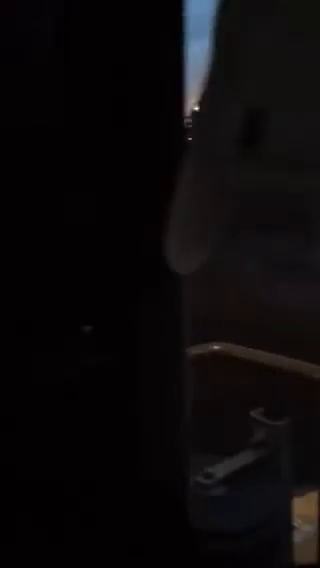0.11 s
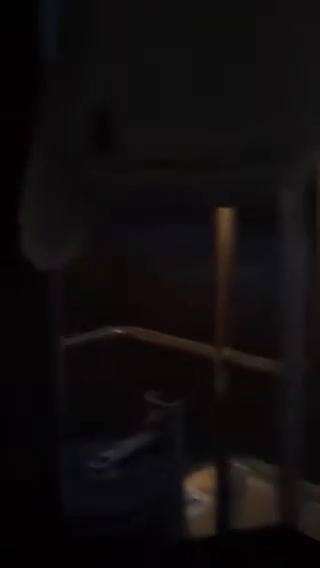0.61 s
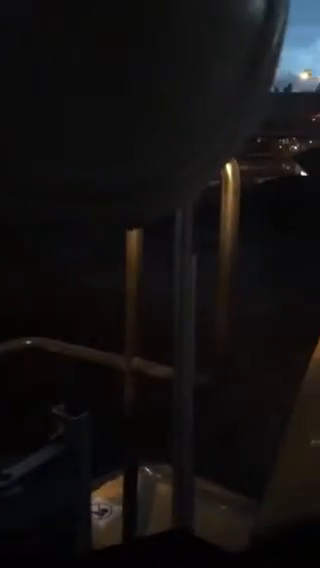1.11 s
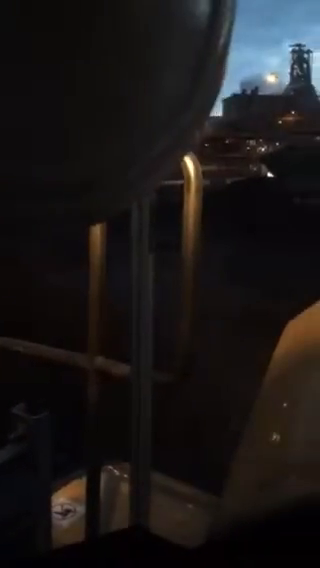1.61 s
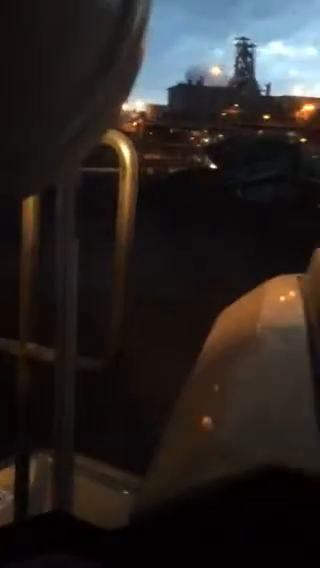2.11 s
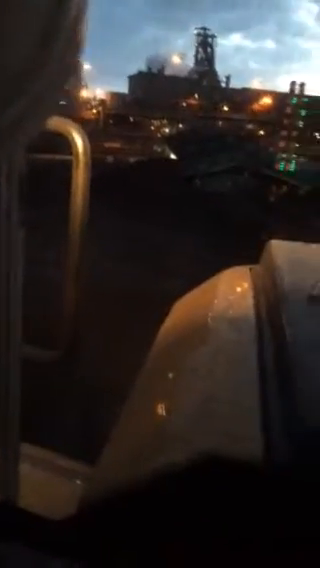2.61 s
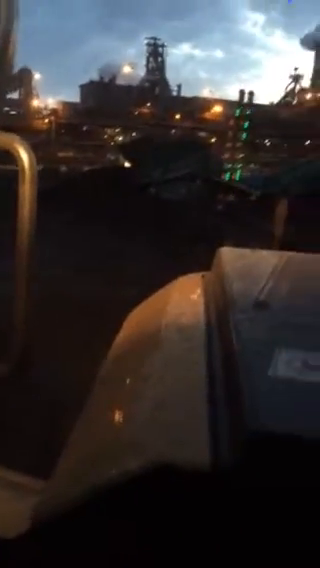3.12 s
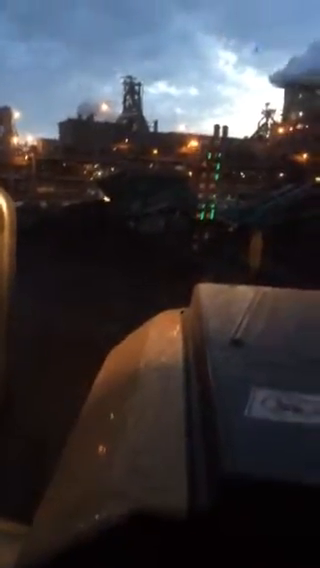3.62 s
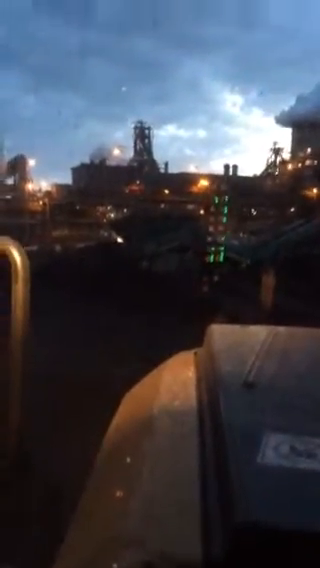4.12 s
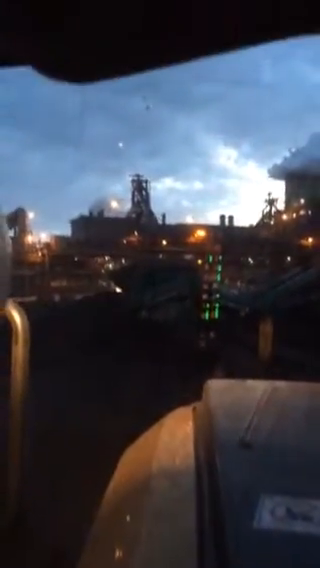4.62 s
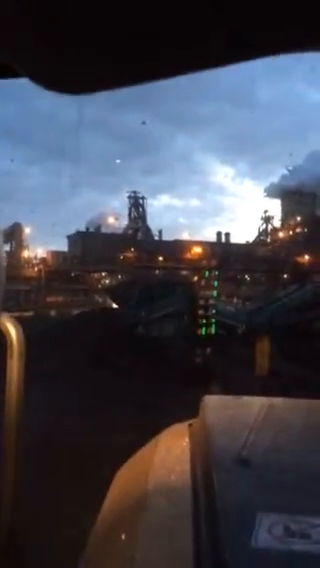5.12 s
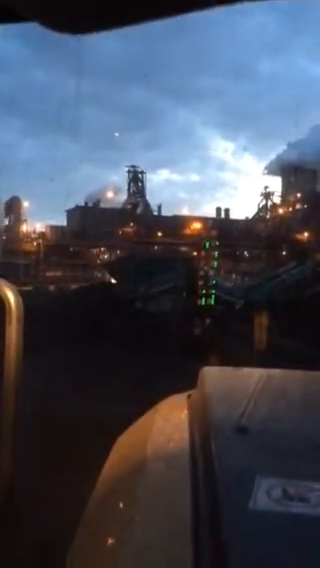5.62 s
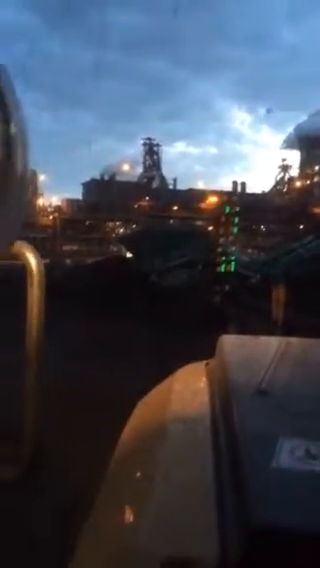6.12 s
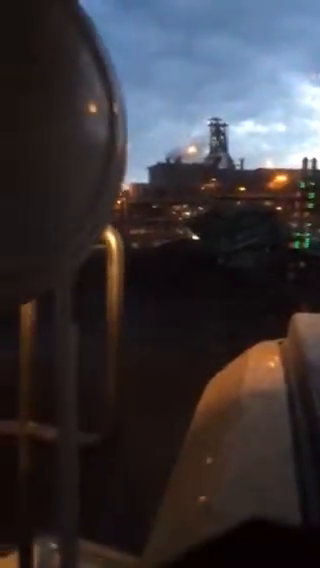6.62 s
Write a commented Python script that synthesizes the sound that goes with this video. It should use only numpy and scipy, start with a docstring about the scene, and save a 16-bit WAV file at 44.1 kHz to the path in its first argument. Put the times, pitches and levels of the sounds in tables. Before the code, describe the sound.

From inside a closed heavy loader cab, a six-cylinder diesel idles throughout, low and boomy, with muffled firing clatter and a steady hydraulic pump hum. A thin blower whine drifts slightly in pitch. Soft hand-like swishes brush near the phone, and a loose panel buzzes faintly in spells. Just after four seconds the idle dips slightly, with dull ticks and a brighter swish, then recovers and continues to the end.

```python
"""Inside a cab: a six-cylinder diesel loader idles near 800 rpm; crank orders and a nine-piston pump hum throughout.
From the start shaken panels boom at an uneven level in the cab's air modes, under firing-pulsed clatter;
a brushed blower motor whines on its own drifting speed beside steady electric tones. A hiss swishes at 0.5 s,
then a panel buzzes in spells. Near 4.1 s the idle sags about 10 rpm, one firing harmonic swells, dull ticks fall
and the brightest swish passes; by 5 s the idle is back, and soft swishes and buzzes run to the end."""
import sys
import numpy as np
from scipy import signal
from scipy.fft import rfft, irfft, next_fast_len
from scipy.io import wavfile
from scipy.ndimage import uniform_filter1d, map_coordinates

SR = 44100
rng = np.random.default_rng(int(sys.argv[2]) if len(sys.argv) > 2 else 0)


def to_wav(sig):
    """Store sig (one row per channel, or 1-D mono) as 16-bit WAV at the path in sys.argv[1].

    Samples outside -1..1 are clipped; the rate is SR.
    """
    pcm = np.clip(np.atleast_2d(sig), -1, 1) * 32767
    pcm = np.round(pcm).astype(np.int16)
    wavfile.write(sys.argv[1], SR, pcm.T)  # frames by channels


def nominal_scale(level):
    """Amplitude ratio for a level in decibels (scalar or array-like)."""
    x = np.asarray(level, float) / 20
    return 10 ** x


N = 297673
T = np.arange(N) / SR  # time in seconds

# short dull ticks: start_s, level_db
TICK_HITS = [(4.094, -55), (4.11, -45.5), (4.17, -50), (4.236, -52)]
# swishes of bright hiss, as of cloth or a hand brushing near the phone; rise and fall each span 20 dB:
# peak_s, level_db, rise_s, hold_s, fall_s
SWISHES = [(.55, -62.5, .2, .17, .5), (1.95, -73, .35, .01, .3), (2.61, -70, .07, .005, .1),
           (3.05, -73, .9, .3, .4), (4.12, -61, .1, .03, .3), (4.87, -75, .05, .005, .05),
           (6.35, -72, .6, .02, .9), (6.73, -67, .12, .05, .2)]
# colour of that hiss: pitch_hz, relative density_db per Hz
HISS_COLOUR = [(600, -4), (1500, 2), (3000, -1), (6000, -5), (10000, -8), (14200, -11), (15400, -15)]
# spells of a buzzing panel: centre_s, half_length_s, level_db
BUZZ_SPELLS = [(.85, .25, -69), (1.2, 0.37, -68), (1.55, .3, -66), (1.95, 0.47, -67.5), (2.45, .2, -67.5),
               (3.0, 0.68, -74), (3.8, 0.48, -71), (5.1, 0.55, -73), (6.3, .25, -75), (6.6, 0.27, -68)]
# tones that ignore the crank, as of electric motors: pitch_hz, level_db (rms)
ELECTRIC_TONES = [(100.3, -36), (200.5, -46), (300.8, -71), (753.5, -67), (2482, -76), (9598, -97),
                  (15032, -103)]
# blower whine over time: time_s, bar_rate_hz of the commutator, level_db (rms) of its strongest harmonic, the 2nd
BLOWER_WHINE = [(0, 1134, -66), (.3, 1137, -68), (.6, 1148, -68), (.92, 1156.5, -61), (1.3, 1151, -70),
                (1.6, 1145, -64), (2.2, 1158.5, -75), (2.6, 1151.5, -63.5), (2.9, 1145, -79),
                (3.3, 1132.5, -70), (3.5, 1130.5, -65.5), (3.9, 1133, -66), (4.15, 1130, -72),
                (4.5, 1135.5, -71), (4.7, 1144, -72), (4.9, 1152, -63.5), (5.5, 1157, -63),
                (5.75, 1153.5, -62), (6.1, 1141, -65), (6.3, 1135.5, -61.5), (6.75, 1130, -63)]
# weaker tones of the blower: order of the shaft speed, level_db (rms)
BLOWER_SHAFT = [(19, -71), (20, -72), (43, -84), (49, -86), (69, -89), (81, -84), (83, -93), (91, -91),
                (99, -88), (101, -89), (107, -95), (108, -95), (109, -94), (113, -96), (117, -94),
                (119, -95), (120, -93), (121, -94), (122, -97), (133, -100), (140, -100), (159, -100),
                (164, -101), (172, -100), (173, -101), (175, -101), (177, -100), (179, -101), (186, -103),
                (200, -105)]
# higher harmonics of the bar rate: harmonic number
BAR_HARMONICS = 3, 4, 5, 8, 9
# their usual levels, in the same sequence: level_db (rms)
BAR_LEVELS = [-81, -83.5, -83, -94, -93]
# moments when one of them swells as the phone moves, a table for each: centre_s, half_length_s, rise_db
BAR_SWELLS = [
    [(.2, .25, 7.5), (1.6, 0.27, 11), (3.6, 1, 8.5), (6.3, .15, 0)],
    [(.15, .2, 9), (.95, 0.49, 11), (1.95, .35, 8), (2.8, .3, 8), (3.7, .15, 6), (4.7, .15, 13),
     (5.6, 0.33, 8)],
    [(.95, .4, 8), (2.3, .15, 0), (2.9, .5, 6.5), (3.85, .3, 7), (4.3, .15, 7), (5.2, .6, 5)],
    [(.2, .3, 4), (1.2, .4, 9), (1.9, .2, 10), (3.7, .3, 3), (4.5, .15, 6), (5.4, .3, 7), (6.2, .3, 8)],
    [(.4, .4, 7), (1.4, .25, 10), (1.9, .2, 10), (2.55, .2, 7), (3.1, .4, 12), (3.9, .3, 10), (4.7, .3, 8),
     (5.5, .15, 6), (6.35, .55, 10)],
]
# colour of the clatter and fan air through the cab walls, low part: pitch_hz, relative density_db per Hz
CLATTER_LOW = [(240, -31), (275, -29.5), (315, -11.5), (400, -2.5), (460, -10.5), (520, -7), (575, -6),
               (640, -11.5), (760, -10.5), (860, -18), (900, -9.5), (1000, -12.5), (1300, -14),
               (1560, -16.5), (1650, -18.5), (1800, -39.5)]
# the same, high part: pitch_hz, relative density_db per Hz
CLATTER_HIGH = [(1600, -17), (1750, -0.5), (2250, -0.5), (2550, -4.5), (2820, -2.5), (2960, -6), (3600, -5),
                (4400, -9), (5200, -10), (6000, -14), (6800, -13.5), (7300, -18.5), (10300, -20.5),
                (13700, -27), (14500, -24), (15400, -35)]
# clatter levels as the phone turns: time_s, low_db, extra_db round 1 kHz, high_db
CLATTER_LEVELS = [(0, -50.5, 4.5, -58), (1.2, -52, 5.5, -58), (3, -49.5, 1.1, -58), (4, -48.5, -2.5, -59),
                  (5, -49, -0.8, -59.5), (6.75, -49, 1.5, -58.5)]
# reflections off glass and panels: extra_path_ms (mean), level_db against the direct sound
REFLECTIONS = [(2.3, -17), (4.1, -16), (6.7, -16), (9.4, -17), (13.9, -17)]
# air modes of the cab: pitch_hz, width_hz (about 3 dB down), relative level_db
CAB_MODES = [(43.3, 54, -14.5), (73.3, 40, -10.5), (99.8, 17.4, -5.5), (116.2, 19.3, -3.5),
             (153.4, 11.2, -1), (179, 9.1, -12), (192.4, 18, -7.5), (213.7, 5.9, -14), (250.6, 17, -19.5)]
# slow and quick level changes of the boom noise: centre_s, half_length_s, lower_modes_db, upper_modes_db
BOOM_LEVEL = [(0.103, 0.42, 1, 1.5), (0.678, 0.052, -9, 0), (0.91, 0.22, 3, 5.5), (1.217, 0.11, -1, -4),
              (1.305, 0.073, 4, 5.5), (1.835, 0.12, -3, 1), (1.99, 0.14, 5, 4), (2.272, 0.072, -7, -1),
              (2.385, .08, 2.5, -4.5), (2.778, .08, -8, 2.5), (2.988, 0.08, -11, 3), (3.298, 0.071, 9, -5),
              (3.567, 0.056, 2, -6), (4.248, 0.26, 1, -1), (4.57, 0.027, -5, -8), (5.154, .2, 2.5, -0.5),
              (5.314, 0.12, -12, 4.5), (5.47, 0.092, 3.5, 4), (5.614, 0.082, -7, 2), (6.645, 0.049, 5, -2),
              (6.74, 0.062, -1.5, 5)]
# engine speed and pump hum over time: time_s, speed_rpm, level_db (rms) of the 4th, 5th, 6th piston-rate harmonic
ENGINE_AND_PUMP = [(0, 799.3, -47.5, -48.7, -72), (1.0, 800.2, -47.7, -49.8, -70),
                   (2.0, 800, -46.8, -47.3, -73), (2.5, 800.4, -47.8, -47.3, -72),
                   (3.0, 799.8, -46, -46.1, -68), (3.85, 799.8, -46, -47, -66),
                   (4.08, 789.5, -46, -48.4, -66), (4.3, 789.8, -46.9, -48.6, -66),
                   (4.5, 793, -46.6, -49, -66), (4.7, 798, -44.9, -46.2, -65),
                   (5.0, 802, -45.3, -46.6, -64), (5.6, 799.8, -46.2, -46.1, -64),
                   (6.75, 800.3, -46, -47.9, -63)]
# engine tones: order of the crank speed
CRANK_ORDERS = [3, 6, 9, 10, 18, 27, 33, 34, 37, 42, 43, 77, 79, 81, 84, 87, 90, 96, 129]
# their levels, in the same sequence: level_db (rms)
CRANK_LEVELS = [-58, -43, -41, -46, -53, -60, -70, -69, -66, -63, -67, -73, -66.5, -64, -75, -73, -71, -70,
                -81]


def columns(table):
    """Each column after the time, drawn as a curve with one value a sample."""
    times_s, *values = np.transpose(table)
    return [np.interp(T, times_s, value) for value in values]


def unit(x):
    """Scales a signal to rms 1."""
    return x / np.sqrt(np.mean(x ** 2))


def walk(rate_hz):
    """Smooth random drift with about this many turns a second, rms 1."""
    size = int(SR / rate_hz)
    steps = np.repeat(rng.standard_normal(N // size + 1), size)[:N]
    return unit(uniform_filter1d(uniform_filter1d(steps, size), size))


def hump(centre_s, half_s):
    """A smooth rise from 0 to 1 and back around a moment."""
    return np.cos(np.pi / 2 * np.clip((T - centre_s) / half_s, -1, 1)) ** 2


def shaped(gain):
    """White noise filtered by a gain given as a function of frequency."""
    size = next_fast_len(N)
    hz = np.maximum(np.fft.rfftfreq(size, 1 / SR), 1)
    return irfft(rfft(rng.standard_normal(size)) * gain(hz), size)[:N]


def coloured(points, flicker_db):
    """Noise following a spectrum, in overlapping bands half an octave apart that each flicker alone."""
    hz, db = np.transpose(points)

    def spectrum(f):
        return nominal_scale(np.interp(np.log(f), np.log(hz), db, left=-200, right=-200))

    first, last = np.floor(2 * np.log2(hz[0])), 2 * np.log2(hz[-1]) + 1
    out = 0
    for middle in np.arange(first, last):  # counted in half octaves
        band = shaped(lambda f: spectrum(f) * np.cos(np.pi / 2 * np.clip(2 * np.log2(f) - middle, -1, 1)))
        out = out + band * nominal_scale(flicker_db * walk(3.89))
    return unit(out)


def tone(turns, db, wobble_db):
    """A sine on a count of turns, at an rms level that wanders by wobble_db."""
    level = np.sqrt(2) * nominal_scale(db + wobble_db * walk(2.527))
    return level * np.sin(2 * np.pi * (turns + rng.random()))


def ticks():
    """Short decaying bursts of mid-band noise, as of plastic settling."""
    centre_hz, width_hz, decay_s = 1900, 900, 0.0064
    band = unit(shaped(lambda f: 1 / (1 + ((f - centre_hz) / width_hz) ** 2)))
    bursts = sum(nominal_scale(db) * (T >= s) * np.exp(-np.maximum(T - s, 0) / decay_s) for s, db in TICK_HITS)
    return band * bursts


def hiss():
    """Coloured noise: a quiet steady floor, and grainy swishes that rise and fall straight in dB."""
    swish = 0
    for peak_s, db, rise_s, hold_s, fall_s in SWISHES:
        before = (peak_s - T) / rise_s
        after = (T - peak_s - hold_s) / fall_s
        swish = swish + nominal_scale(db - 20 * np.maximum(np.maximum(before, after), 0))
    grain = unit(nominal_scale(1.9 * walk(200)))  # fast flutter in dB
    return (nominal_scale(-86.5) + swish * grain) * coloured(HISS_COLOUR, flicker_db=3.0)


def panel_buzz():
    """A loose panel as a narrow band of noise, fluttering in spells."""
    band = unit(shaped(lambda f: 1 / (1 + ((f - 3620) / 130) ** 2)))
    spells = sum(nominal_scale(db) * hump(s, half_s) for s, half_s, db in BUZZ_SPELLS)
    return spells * nominal_scale(2.1 * walk(16)) * band


def electric():
    """Sines of fixed pitch, free of the crank, with levels that wander."""
    return sum(tone(hz * T, db, wobble_db=2.5) for hz, db in ELECTRIC_TONES)


def blower():
    """A brushed motor: strong bar harmonics, and weaker shaft orders because no two bars are alike."""
    bars_per_turn = 20
    bar_hz, second_db = columns(BLOWER_WHINE)
    bars = np.cumsum(bar_hz * (1 + .0002 * walk(25))) / SR  # bars passed, with a slight speed jitter
    out = tone(2 * bars, second_db, wobble_db=0)
    for harmonic, db, swells in zip(BAR_HARMONICS, BAR_LEVELS, BAR_SWELLS):
        swell_db = sum(rise_db * hump(s, half_s) for s, half_s, rise_db in swells)
        out = out + tone(harmonic * bars, db + swell_db, wobble_db=1.5)
    shaft = sum(tone(order / bars_per_turn * bars, db, wobble_db=4) for order, db in BLOWER_SHAFT)
    return out + shaft


def reflect(x):
    """Glass and panels close by; the paths drift as the hand moves, so narrow peaks come and go."""
    out = x
    for path_ms, db in REFLECTIONS:
        lag = (path_ms + .12 * walk(.8)) * SR / 1000  # in samples
        out = out + nominal_scale(db) * map_coordinates(x, [np.arange(N) - lag], order=3, mode="wrap")
    return unit(out)


def clatter(crank):
    """Broad noise that pulses a little with each firing, three a turn."""
    puff = np.exp(-(3 * crank % 1) / .3)  # dies away over each firing interval
    low_db, middle_db, high_db = columns(CLATTER_LEVELS)
    low = coloured(CLATTER_LOW, flicker_db=0.47) * unit(1 + 0.29 * puff)
    middle = signal.lfilter(*signal.iirpeak(1080, 2.5, SR), low)
    high = coloured(CLATTER_HIGH, flicker_db=.5) * unit(1 + 0.13 * puff)
    body = low + (nominal_scale(middle_db) - 1) * middle
    return nominal_scale(low_db) * body + nominal_scale(high_db) * reflect(high)


def boom():
    """Random shaking rings each air mode of the cab; steep skirts keep the valleys dark."""
    low_change_db = sum(db * hump(s, half_s) for s, half_s, db, _ in BOOM_LEVEL)
    high_change_db = sum(db * hump(s, half_s) for s, half_s, _, db in BOOM_LEVEL)
    deep_db = -31 + 0.23 * low_change_db + 1.1 * walk(4.93)  # the chassis rocks in uneven lumps
    low_db = -30.5 + low_change_db
    high_db = -34 + high_change_db
    out = 0
    for hz, width_hz, db in CAB_MODES:
        ring = unit(shaped(lambda f: 1 / (1 + ((f - hz * hz / f) / (1.45 * width_hz)) ** 2)))
        group_db = deep_db if hz < 85 else low_db if hz < 136 else high_db
        out = out + nominal_scale(db + group_db) * ring
    return out


def pump(crank, levels_db):
    """A nine-piston pump on the shaft: three harmonics of its piston rate."""
    pistons = 9
    return sum(tone(k * pistons * crank, db, wobble_db=0) for k, db in zip((4, 5, 6), levels_db))


def laboured(crank, rpm):
    """The fourth firing harmonic, crank order 12, grows as the load pulls the idle down near a cab mode."""
    idle_rpm, idle_db, db_per_rpm = 800, -48, 1.55
    sag_rpm = np.clip(idle_rpm - rpm, 0, 12)
    return tone(12 * crank, idle_db + db_per_rpm * sag_rpm, wobble_db=1.5)


def engine(crank):
    """Firing and rotation as sines on whole orders of the crank."""
    return sum(tone(order * crank, db, wobble_db=.9) for order, db in zip(CRANK_ORDERS, CRANK_LEVELS))


def scene():
    """Everything sums in the small cab, the engine parts sharing one crank."""
    rpm, *pump_db = columns(ENGINE_AND_PUMP)
    crank = np.cumsum(rpm) / 60 / SR  # turns of the crank so far
    background = ticks() + hiss() + panel_buzz() + electric() + blower()
    shaken = clatter(crank) + boom()
    machine = pump(crank, pump_db) + laboured(crank, rpm) + engine(crank)
    return (background + shaken + machine)[None]  # one channel


def roll_off(x):
    """The treble ends steeply here."""
    return signal.sosfilt(signal.butter(12, 15180, fs=SR, output="sos"), x)


def record(dry):
    """The phone takes the finished mix as it stands."""
    return roll_off(dry)


dry = scene()
out = record(dry)
to_wav(out)
```